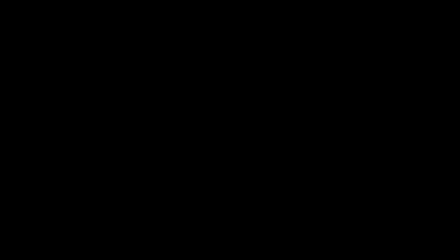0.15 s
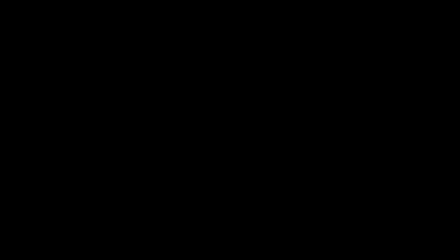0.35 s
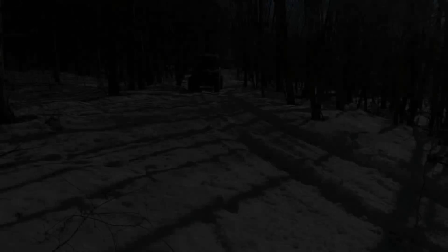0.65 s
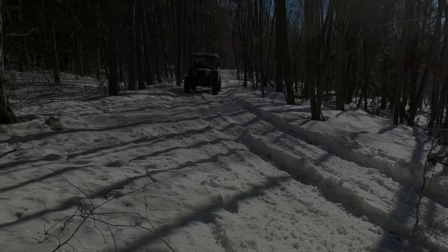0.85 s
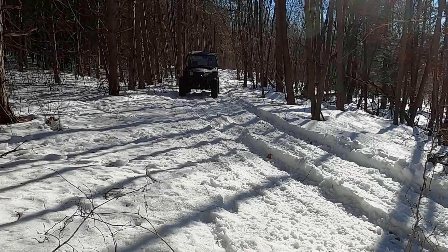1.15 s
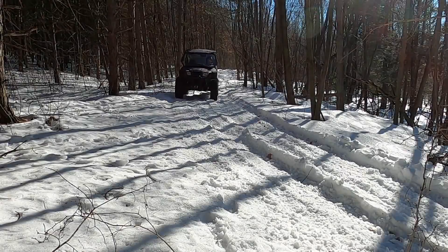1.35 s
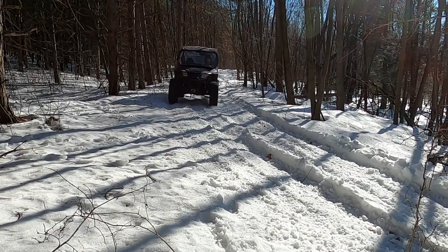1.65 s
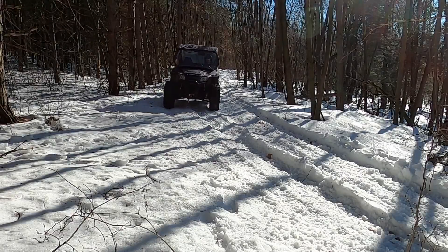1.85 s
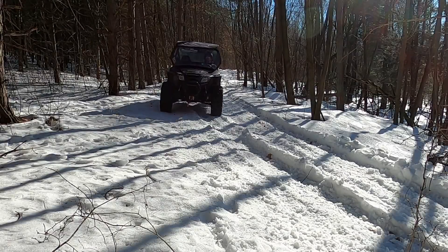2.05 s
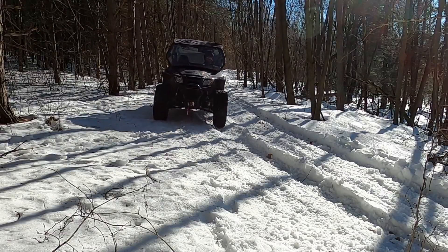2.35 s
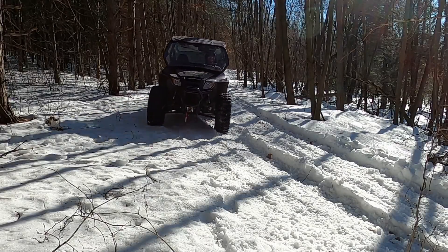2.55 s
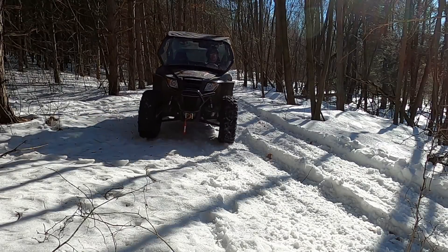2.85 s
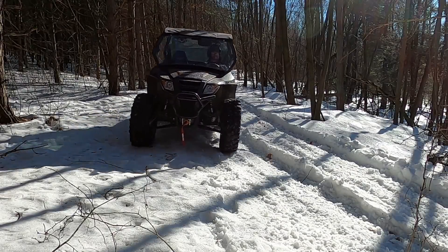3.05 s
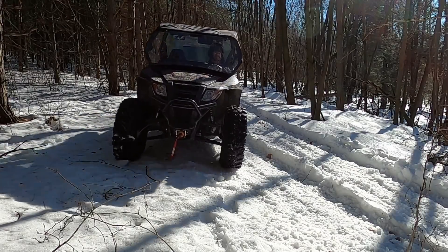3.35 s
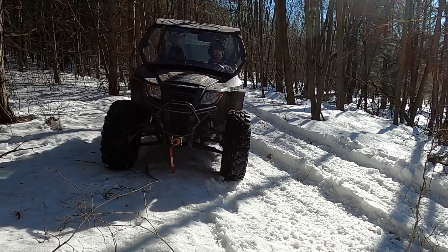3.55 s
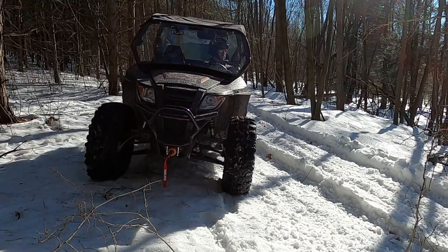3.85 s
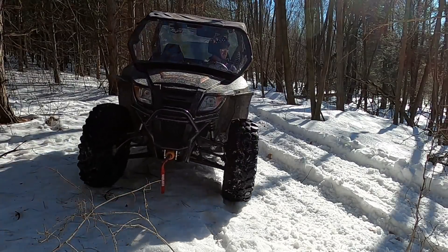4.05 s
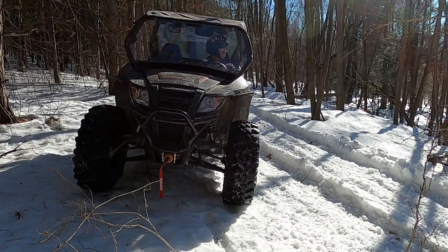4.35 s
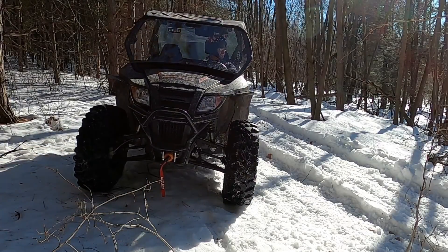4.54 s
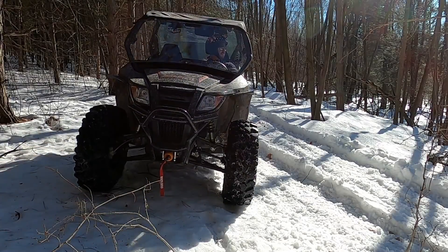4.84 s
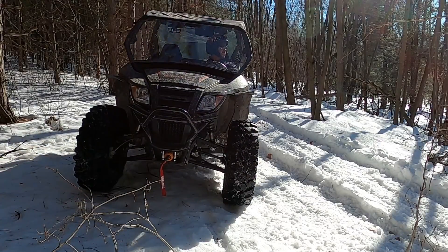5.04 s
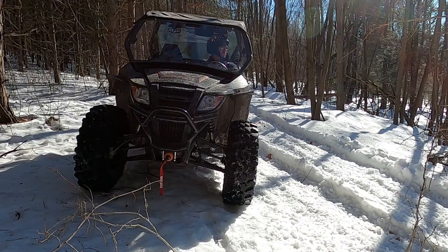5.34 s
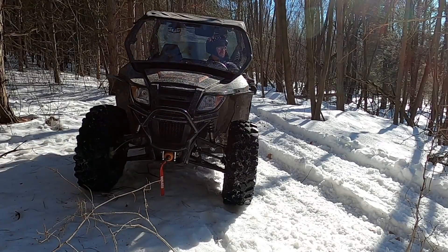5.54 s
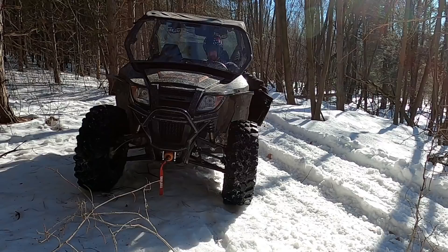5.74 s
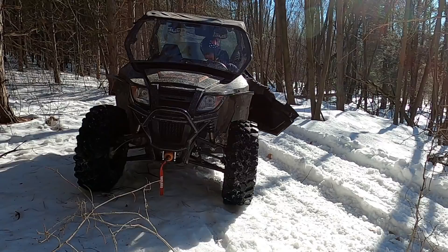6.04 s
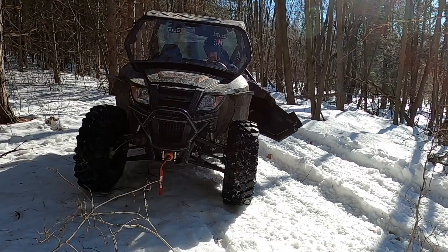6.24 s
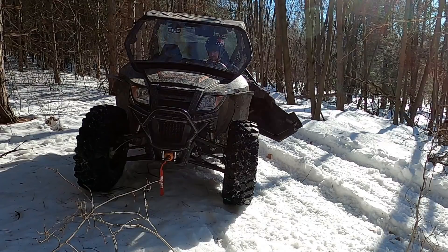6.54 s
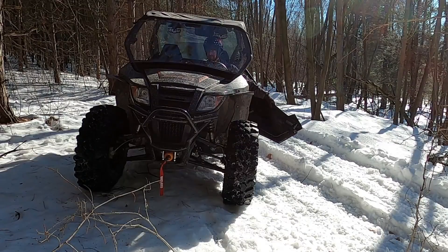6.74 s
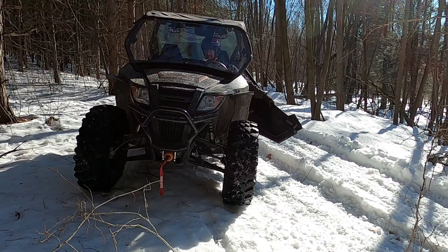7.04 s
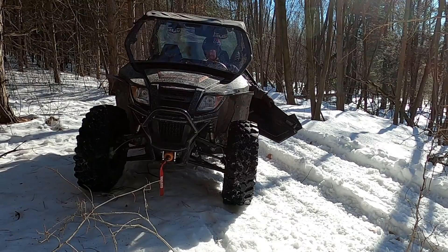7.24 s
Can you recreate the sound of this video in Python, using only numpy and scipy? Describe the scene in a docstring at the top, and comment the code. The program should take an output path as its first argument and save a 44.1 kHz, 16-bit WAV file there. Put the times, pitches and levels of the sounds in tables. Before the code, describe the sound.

An off-road buggy drives up over crunching snow, slows to a stop and idles lumpily while a buckle and a door latch click.

```python
"""Side-by-side stopping on crusted snow

A twin-cylinder side-by-side rolls up, slows, halts close by and idles with a lumpy beat. Firing pulses
boom and bark through pipe and silencer, over gear whine, valve ticks and belt hiss. The tyres crunch
the snow in thousands of tiny fractures, break the crust and snap twigs, while the chassis rumbles
and knocks. Over the idle, a buckle snaps open and the door latch clicks, each with a short ring."""
import sys
import numpy as np
from scipy import signal
from scipy.fft import rfft, irfft
from scipy.io import wavfile

SR = 44100
rng = np.random.default_rng(int(sys.argv[2]) if len(sys.argv) > 2 else 0)


def wav_out(sig):
    """Save sig, one row per channel (or a flat mono array), as 16-bit PCM at SR to the path in sys.argv[1]."""
    wavfile.write(sys.argv[1], SR, np.round(np.clip(np.atleast_2d(sig).T, -1, 1) * 32767).astype(np.int16))


N = 325899
TIME = np.arange(N) / SR
LIFT_S, PULL_S, IDLE_S = 1.63, 2.187, 3.91  # the driver lifts off, pulls again, drops to idle
THROTTLE_CLOSE_S, THROTTLE_OPEN_S = .1, 0.16
NEAR_S, NEARING_S, HALT_S = 1.2, 0.64, 4.325  # the approach starts and lasts; the wheels halt

# crank speed, one firing a turn: t/s, f/Hz
CRANK_SPEED = [(0.0, 64.91), (0.8, 64.68), (1.05, 67.51), (1.62, 65.1), (1.78, 55.26), (2.03, 49.0),
               (2.7, 35.53), (2.85, 40.02), (3.55, 35.99), (3.95, 25.62), (4.25, 21.93), (4.65, 23.51),
               (5.15, 22.55), (5.55, 23.73), (6.1, 22.64), (6.7, 23.13), (7.39, 22.45)]
# exhaust boom under way: t/s, level/dB
BOOM_LEVEL = [(0, -23), (1.6, -19.5), (2.6, -22.5), (3.7, -20.5)]
# the boom's harmonics: crank order, cruising level/dB, coasting change/dB, lugging change/dB
BOOM_ORDERS = [(1, 0.4, 1.5, -1.5), (2, 0, 1.9, -1.5), (3, -5, -12, -1.5), (4, -3, -7.5, 3.5)]
# peaks and dips of the pipe's standing waves: f/Hz, level/dB
PIPE_WAVES = [(27, -22), (36, -3.5), (54, -2.5), (68, -6), (100, -6), (130, 0), (143, -4), (158, -10.5),
              (175, -21), (197, -9), (220, -18), (270, -48)]
# engine effort, heard as bark: t/s, level/dB
BARK_LEVEL = [(.5, -52), (.66, -40), (1.1, -47), (2.4, -46), (2.65, -40.5), (3.1, -35), (3.9, -39)]
# tone of pipe and silencer under way: f/Hz, level/dB
BARK_COLOUR = [(90, -38.5), (150, 8.5), (190, 11.5), (250, 7), (330, 5.5), (430, 2.5), (530, -6.5),
               (700, -33), (1100, -26.5), (2000, -43.5), (5000, -53)]
# silencer chambers that smear each pulse: f/Hz, width/Hz
CHAMBERS = [(172, 330), (153.7, 26), (392.5, 80), (302, 160), (515, 98)]
# gear tones: crank order, level/dB
WHINE_ORDERS = [(5, 0.5), (8, -1.5), (16, -6)]
# valve gear and belt drive: t/s, level/dB
CLATTER_LEVEL = [(2, -52.5), (4.6, -57.5), (5.9, -57), (6.25, -56)]
# tone of valve gear and belt drive: f/Hz, level/dB
CLATTER_COLOUR = [(320, -26), (550, 0.5), (748, -11.5), (825, -11), (872, -9), (1250, -11.5), (1440, -9.5),
                  (1830, -15), (2220, -11), (2450, -18.5), (4290, -24.5), (4660, -25), (15500, -56)]
# engine casing resonances: f/Hz, width/Hz, level/dB
CASING_MODES = [(798, 18, 4.5), (1570, 64, 1.5), (1970, 70, -2.5)]
# tyres rolling on snow: t/s, level/dB
TYRE_LEVEL = [(0, -49.5), (.25, -44.5), (.45, -48.5), (.9, -50), (1.45, -45.5), (1.9, -46), (2.25, -48.5),
              (2.6, -46.5), (3.4, -44.5), (4.25, -48)]
# tone of crushed snow: f/Hz, level/dB
SNOW_COLOUR = [(290, -23), (500, -2.5), (686, -3), (792, -8.5), (863, -3.5), (1430, -6), (1600, -4),
               (3060, -9.5), (3680, -10), (6830, -23.5), (7890, -25), (9920, -31.5), (11300, -40),
               (12500, -37), (15500, -48)]
# the crunch swells as a wheel sinks through the crust: t/s, boost/dB, half length/s
SINKS = [(0.626, 5.5, 0.16), (1.785, 6.5, 0.052), (1.955, 3.5, 0.056), (2.46, 0.5, .04), (2.78, 2.5, 0.036),
         (3.01, 0.5, 0.11), (3.576, 3, 0.049), (3.884, 2.5, 0.034)]
# tone of the shaking ground: f/Hz, level/dB
RUMBLE_COLOUR = [(10, -14), (28, -12), (60, -3), (120, -1), (250, -19), (600, -46), (2000, -78.5)]
# the crust breaks: t/s, level/dB, decay/s
CRACKS = [(1.48, -41, 0.023), (1.745, -40, 0.031), (1.94, -45, .03), (2.587, -40, 0.014),
          (2.694, -45, 0.0096), (3.563, -38, 0.022)]
# tone of cracking crust and twigs: f/Hz, level/dB
CRACK_COLOUR = [(200, -3), (600, 3), (1400, 0), (2100, 1), (3000, -1.5), (7000, -9), (10000, -21),
                (15000, -36)]
# chassis knocks: t/s, level/dB, decay/s
KNOCKS = [(2.025, -40, .025), (2.59, -39.5, 0.049), (3.105, -35.5, 0.014), (4.308, -30, 0.016),
          (4.58, -43.5, 0.013)]
# tone of a knock: f/Hz, level/dB
KNOCK_COLOUR = [(200, -13.5), (420, 7), (580, 1), (780, 0), (1050, 1.5), (1400, -24), (2500, -26.5),
                (8000, -42), (14000, -62)]
# engine coughs: t/s, level/dB, decay/s
COUGHS = [(2.69, -24.5, .015), (3.585, -24, 0.02), (3.75, -22, 0.016)]
# tone of a cough: f/Hz, level/dB
COUGH_COLOUR = [(80, -11), (170, -3), (235, -5), (320, -17), (700, -36), (2000, -68)]
# twig snaps: t/s, level/dB, decay/s
TWIG_SNAPS = [(2.98, -34, .004), (3.023, -35, 0.0045), (3.057, -38.5, 0.0026), (3.5548, -29.5, 0.0055),
              (3.6, -34.5, 0.0028)]
# woody ring of a twig: f/Hz, level/dB, t60/s
TWIG_MODES = [(1260, -16, .03), (2050, 2, 0.038), (2240, 0, 0.03), (4500, -12, 0.022)]
# firings that barely catch: t/s, level/dB
MISFIRES = [(3.925, -21), (4.173, -7), (5.046, -12.5), (5.221, -11), (5.564, -8), (5.691, -15.5),
            (5.86, -9.5), (6.038, -8.5), (6.349, -14.5), (6.516, -11.5), (6.689, -11.5)]
# tone of pipe and silencer at idle: f/Hz, level/dB
IDLE_COLOUR = [(12, -33.5), (23, -10), (46, -2.5), (70, 3.5), (95, -2), (132, 6.5), (165, -9), (205, -14.5),
               (260, -20.5), (320, -28), (420, -29.5), (560, -48), (900, -64.5), (2000, -93.5)]
# the buckle snaps and swings: t/s, level/dB, decay/s
BUCKLE_HITS = [(5.268, -52.5, 0.013), (5.3505, -36.5, 0.004), (5.357, -38.5, 0.0065), (5.52, -58, 0.0066)]
# tone of the buckle's snap: f/Hz, level/dB
BUCKLE_COLOUR = [(250, -16.5), (480, 5), (700, 7), (1300, -2), (2500, 3), (3500, 3), (4900, -10.5),
                 (6800, -9.5), (8600, -16), (11000, -25.5), (12500, -27), (15000, -30)]
# ring of its housing and steel tongue: f/Hz, level/dB, t60/s
BUCKLE_MODES = [(460, 11.5, 0.079), (600, 13, 0.044), (1590, -4, 0.13), (3310, 8, 0.047), (3750, 1, 0.22),
                (7822, -9, 0.11), (8457, -5, .09), (12090, -15, .1)]
# latch clicks, then rattles of the open door: t/s, level/dB, decay/s
LATCH_HITS = [(5.746, -51.5, 0.025), (5.772, -39.5, 0.0058), (5.7755, -43, 0.0042), (6.607, -62.5, 0.019),
              (6.812, -61, 0.014)]
# tone of the latch: f/Hz, level/dB
LATCH_COLOUR = [(500, -12.5), (1100, -4.5), (2300, 3), (3100, 0.5), (4200, 1.5), (5000, -4.5), (5900, -3.5),
                (8000, -12), (10000, -23), (14000, -37.5)]
# ring of the latch's pawl: f/Hz, level/dB, t60/s
PAWL_MODES = [(2230, 3, 0.078), (4000, -3, 0.14), (5640, -5.5, .08)]


def amp(db):
    """Decibels to gain."""
    return 10 ** (np.asarray(db) / 20)


def unit_rms(x):
    """Scales to rms 1."""
    return x / np.sqrt(np.mean(x ** 2) + 1e-20)


def curve(rows):
    """An envelope through (time, value) breakpoints."""
    return np.interp(TIME, *np.transpose(rows))


def since(s, rise):
    """Zero, rising to one from time s on."""
    return np.clip((TIME - s) / rise, 0, 1)


def until(s, fade):
    """One, falling to zero at time s."""
    return np.clip((s - TIME) / fade, 0, 1)


def wander(hz):
    """Random drift of rms 1, rolled off above hz."""
    rolloff = 1 + (np.fft.rfftfreq(N, 1 / SR) / hz) ** 4
    return unit_rms(irfft(rfft(rng.standard_normal(N)) / rolloff, N))


def band(x, lo_hz, hi_hz):
    """Band-pass."""
    return signal.sosfilt(signal.butter(3, [lo_hz, hi_hz], "band", fs=SR, output="sos"), x)


def colour(x, outline, size=16384):
    """Minimum-phase EQ through (frequency, level) points."""
    hz, db = np.transpose(outline)
    bin_hz = abs(np.fft.fftfreq(size, 1 / SR))
    log_gain = np.log(amp(np.interp(np.log(bin_hz + 1), np.log(hz + 1), db)))
    response = np.fft.ifft(np.exp(np.conj(signal.hilbert(log_gain)))).real
    return signal.oaconvolve(x, response[:size // 2])[:N]


def resonance(x, hz, width):
    """One resonant band."""
    return signal.lfilter(*signal.iirpeak(hz, hz / width, SR), x)


def clicks(times, sizes):
    """A train of single impulses."""
    return np.bincount(np.clip(np.round(times * SR).astype(int), 0, N), sizes, N + 1)[:N]


def strokes(turns, angle):
    """The times at which the crank passes an angle, given in turns."""
    return np.interp(np.arange(int(turns[-1]) + 1) + angle, turns, TIME, right=TIME[-1] + 1)


def hits(rows, outline, tail_db, tail_s, grit=.5):
    """Short gritty bursts through a body's colour, each with a faint tail from the trees."""
    burst, tail = np.zeros((2, N))
    for s, db, decay in rows:
        span = slice(round(s * SR), round(s * SR) + SR // 2)
        age = TIME[span] - s
        burst[span] += amp(db) * np.exp(-age / decay)
        tail[span] += amp(db + tail_db) * np.exp(-age / tail_s)
    grains = unit_rms(rng.standard_normal(N) * np.exp(grit * rng.standard_normal(N)))
    eq_gain = np.std(colour(rng.standard_normal(N), outline))
    return colour(burst * grains + tail * rng.standard_normal(N), outline) / eq_gain


def ringing(rows, modes, ring_db):
    """Every blow sets a part's modes ringing."""
    times, db, _ = np.transpose(rows)
    age = TIME[:SR // 2]
    tone = sum(amp(level - 60 * age / t60) * np.sin(2 * np.pi * hz * age) for hz, level, t60 in modes)
    return signal.oaconvolve(clicks(times, amp(db + ring_db)), tone)[:N]


def silencer(x, chambers):
    """Each chamber delays its own band without changing its level."""
    for hz, width in CHAMBERS[:chambers]:
        x = x - 2 * resonance(x, hz, width)
    return x


def boom(turns, flutter_db=1.05, strain_db=2.14, dispersion=0.882):
    """Low crank orders glide through the pipe's standing waves and turn ragged as the engine lugs."""
    crank_hz = curve(CRANK_SPEED)
    lugging = np.clip((46 - crank_hz) / 8, 0, 1)
    coasting = since(LIFT_S, THROTTLE_CLOSE_S) - since(PULL_S, THROTTLE_OPEN_S)
    wave_hz, wave_db = np.transpose(PIPE_WAVES)
    tone = 0
    for order, db, coast_db, lug_db in BOOM_ORDERS:
        load_db = db + coast_db * coasting + lug_db * lugging
        pipe_db = np.interp(np.log(order * crank_hz), np.log(wave_hz), wave_db)
        ragged_db = (flutter_db + strain_db * lugging) * wander(34)
        phase = 2 * np.pi * order * turns - dispersion * order ** 2  # the pipe delays high orders more
        tone = tone + amp(load_db + pipe_db + ragged_db) * np.cos(phase)
    return np.sqrt(2) * tone * amp(curve(BOOM_LEVEL)) * (1 - since(IDLE_S, 0.021))


def bark(turns, uneven_db=1.73, jitter_s=.00007, rough=0.74, second_share=0.39):
    """Each turn under way gives a firing pulse and a weaker one about half a turn on, in rough gas."""
    fire, second = strokes(turns, 0.018), strokes(turns, 0.5823)
    size, late = rng.standard_normal((len(fire), 2)).T
    strength, delay = amp(uneven_db * size), jitter_s * late
    pulses = clicks(fire + delay, strength) + clicks(second + delay, second_share * strength)
    puffs = rng.standard_normal(N) * (1 + 0.099 * np.cos(2 * np.pi * (turns - .2)))
    gas = silencer(colour(unit_rms(pulses) + rough * unit_rms(puffs), BARK_COLOUR), chambers=5)
    gas /= np.std(band(gas, 230, 480)[TIME < 4])  # the low mids set the level
    return gas * amp(curve(BARK_LEVEL)) * until(4.05, 0.17)


def whine(turns, level_db=-47.5, lift_db=-9.5, waver_db=3.0, slip_turns=0.084):
    """Wavering gear tones follow the crank; they weaken once the driver lifts off."""
    tones = 0
    for order, db in WHINE_ORDERS:
        gain = amp(db + waver_db * wander(6.1))
        tones = tones + gain * np.cos(2 * np.pi * (order * turns + slip_turns * wander(26)))
    return tones * amp(level_db + lift_db * since(LIFT_S, THROTTLE_CLOSE_S)) * until(2.7, 0.68)


def clatter(turns, tick_db=-8.0, tick_s=0.0017, jitter_s=0.00081, casing_db=-14.5, uneven_db=1.5):
    """Valves tick four times a turn over the hiss of the belt drive, and the casing rings."""
    times = strokes(4 * turns, .3)
    size, late = rng.standard_normal((len(times), 2)).T
    taps = clicks(times + jitter_s * late, amp(uneven_db * size))
    tick_envelope = signal.lfilter([1], [1, -np.exp(-1 / (tick_s * SR))], taps)
    hiss = rng.standard_normal(N)
    drive = hiss + amp(tick_db) * unit_rms(tick_envelope * rng.standard_normal(N))
    casing = sum(amp(db) * unit_rms(resonance(drive, hz, width)) for hz, width, db in CASING_MODES)
    machinery = unit_rms(colour(drive, CLATTER_COLOUR)) + amp(casing_db) * unit_rms(casing)
    return machinery * amp(curve(CLATTER_LEVEL) + 0.88 * wander(7.3))


def tyres(grains_per_s=3500, spread_db=0.5, wash=0.99, clump_db=1., settle_db_per_s=150):
    """Tread blocks crush the snow: tiny fractures come in clumps and die out as the wheels halt."""
    sizes = amp(spread_db * np.minimum(rng.exponential(1, N), 5)) * rng.choice([-1, 1], N)
    grains = unit_rms(sizes * (rng.random(N) < grains_per_s / SR))
    snow = colour((grains + wash * rng.standard_normal(N)) * amp(clump_db * wander(43)), SNOW_COLOUR)
    sink_db = sum(db * np.exp(-((TIME - s) / length) ** 2) for s, db, length in SINKS)
    near = since(NEAR_S, NEARING_S)  # brighter as the vehicle nears and slows: less squeeze, more fizz
    squeeze = unit_rms(band(snow, 480, 1570)) * amp(3.5 - 5.5 * near + 0.66 * sink_db + 1.1 * wander(7.1))
    crunch = unit_rms(band(snow, 1380, 5900)) * amp(sink_db)
    fizz = unit_rms(band(snow, 5710, 19000)) * amp(-13.5 + 4 * near + sink_db)
    settle_db = settle_db_per_s * np.maximum(TIME - HALT_S, 0)
    return (squeeze + crunch + fizz) * amp(curve(TYRE_LEVEL) + 0.5 * wander(7.7) - settle_db)


def rumble(over_tyres_db=12.5, near_db=-4.5):
    """The rolling wheels and chassis shake the ground."""
    shake = unit_rms(colour(rng.standard_normal(N), RUMBLE_COLOUR))
    level_db = curve(TYRE_LEVEL) + over_tyres_db + near_db * since(NEAR_S, NEARING_S)
    return shake * amp(level_db) * (1 - since(HALT_S, .15))


def crust():
    """The snow's crust breaks under the tyres in sharp cracks."""
    return hits(CRACKS, CRACK_COLOUR, tail_db=-15, tail_s=0.036)


def knocks():
    """The chassis knocks over ruts and as it stops."""
    return hits(KNOCKS, KNOCK_COLOUR, tail_db=-16.5, tail_s=0.06, grit=.2)


def coughs():
    """The lugging engine coughs in low, dull bursts."""
    return hits(COUGHS, COUGH_COLOUR, tail_db=-19, tail_s=0.038)


def twigs():
    """Dry twigs snap under the tyres with a woody ring."""
    snaps = hits(TWIG_SNAPS, CRACK_COLOUR, tail_db=-22, tail_s=0.022)
    return snaps + ringing(TWIG_SNAPS, TWIG_MODES, ring_db=-2.5)


def idle(turns, level_db=-19.5, uneven_db=1.33, lope_db=-0.5, jitter_s=0.00027, sag_s=0.00095,
         gulp=1.25, gulp_hz=67, rough=0.74):
    """A blow-down pulse each turn and a soft intake gulp nearly half a turn on, lumpy with misfires."""
    fire, intake = strokes(turns, .04), strokes(turns, .47)
    size, late, breath = rng.standard_normal((len(fire), 3)).T
    weak_db, delay = np.zeros(len(fire)), jitter_s * late
    for s, db in MISFIRES:
        k = np.argmin(abs(fire - s))
        weak_db[k:] = lope_db * (np.arange(len(fire) - k) % 4 == 0)  # every fourth firing is weaker
        weak_db[k] = db
        delay[k + 1:k + 2] += sag_s  # the crank is late for the next firing
    breaths = clicks(intake + delay, gulp * amp(uneven_db * breath))
    gulps = signal.lfilter(*signal.butter(1, gulp_hz, fs=SR), breaths)
    pulses = clicks(fire + delay, amp(uneven_db * size + weak_db)) + gulps
    puffs = band(rng.standard_normal(N), 210, 1000) * (1 + 0.27 * np.exp(-(turns % 1) / 0.14))
    gas = -silencer(colour(unit_rms(pulses) + rough * puffs, IDLE_COLOUR), chambers=3)
    gas /= np.std(gas[TIME > 4])
    stumble_db = -1.6 * (1 - since(4.18, 0.056))  # starts weak, then recovers
    return gas * amp(level_db + stumble_db) * since(IDLE_S, 0.057)


def buckle():
    """A buckle snaps open and swings; its housing and steel tongue ring."""
    snaps = hits(BUCKLE_HITS, BUCKLE_COLOUR, tail_db=-16.5, tail_s=0.049)
    return snaps + ringing(BUCKLE_HITS, BUCKLE_MODES, ring_db=-13.5)


def latch():
    """The latch lets go and the open door rattles; each click rings the pawl."""
    clacks = hits(LATCH_HITS, LATCH_COLOUR, tail_db=-16.5, tail_s=0.043)
    return clacks + ringing(LATCH_HITS, PAWL_MODES, ring_db=-13.5)


def scene():
    """Engine, ground and the small noises of the body, mixed in mono."""
    turns = np.cumsum(curve(CRANK_SPEED)) / SR
    exhaust = boom(turns) + bark(turns) + idle(turns) + coughs()
    engine = exhaust + whine(turns) + clatter(turns)
    ground = tyres() + rumble() + twigs() + crust()
    body = knocks() + buckle() + latch()
    return (engine + ground + body)[None]


def record(dry, fade_db=-12, fade_s=0.97, cutoff_hz=15700):
    """A fade-in and a steep cut of the top end."""
    faded = dry * amp(fade_db * until(fade_s, fade_s))
    lowpass = signal.firwin(511, cutoff_hz, window=("kaiser", 9), fs=SR)
    return signal.oaconvolve(faded, lowpass[None], "same")


dry = scene()
out = record(dry)
wav_out(out)
```